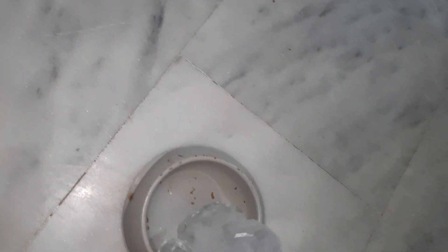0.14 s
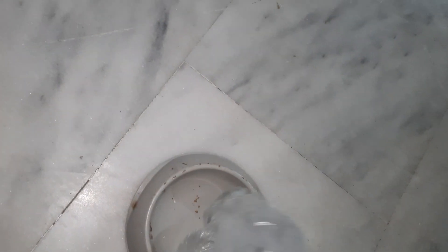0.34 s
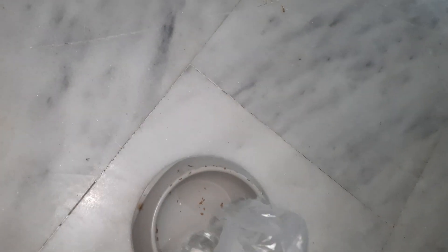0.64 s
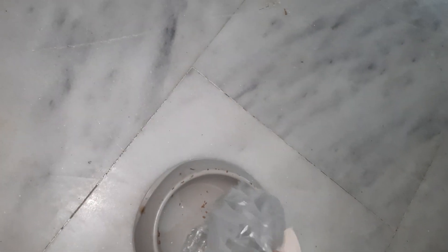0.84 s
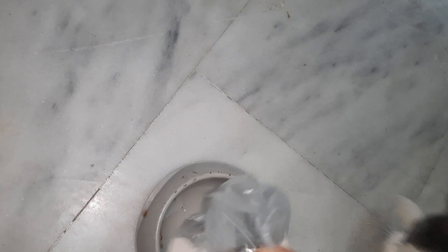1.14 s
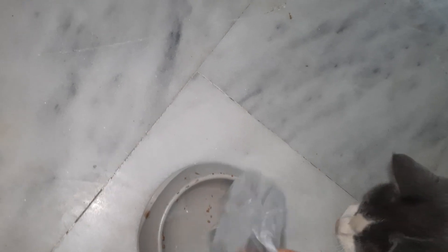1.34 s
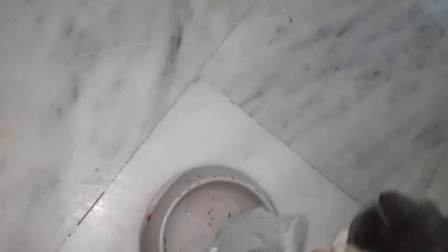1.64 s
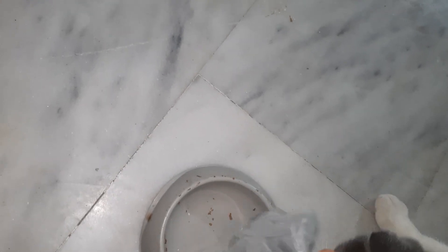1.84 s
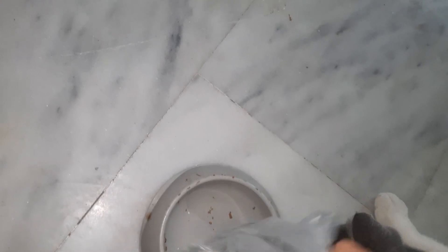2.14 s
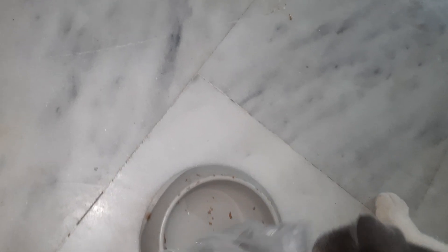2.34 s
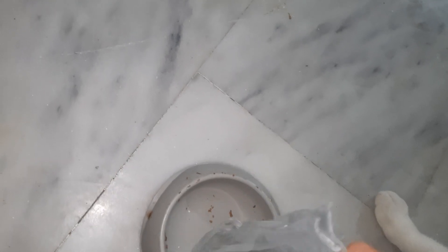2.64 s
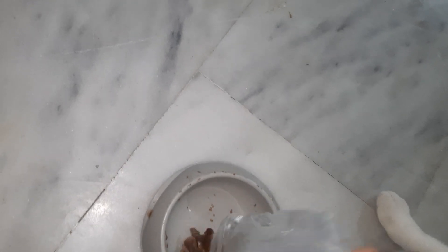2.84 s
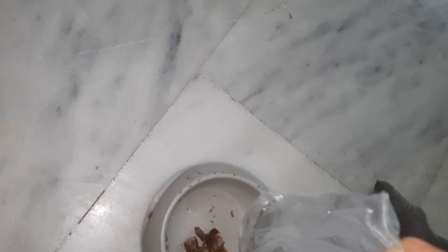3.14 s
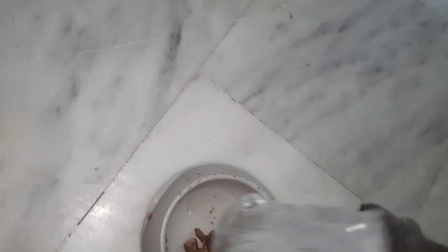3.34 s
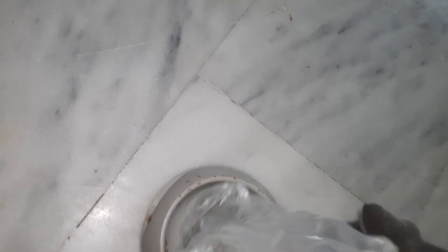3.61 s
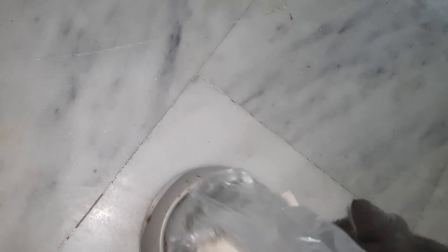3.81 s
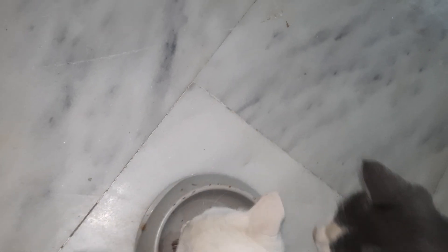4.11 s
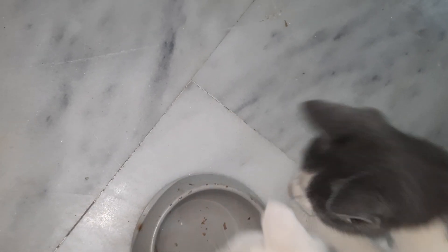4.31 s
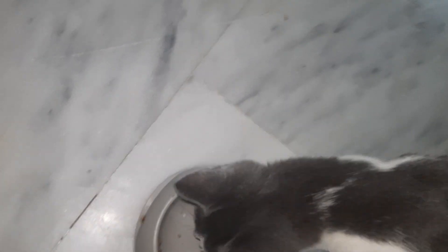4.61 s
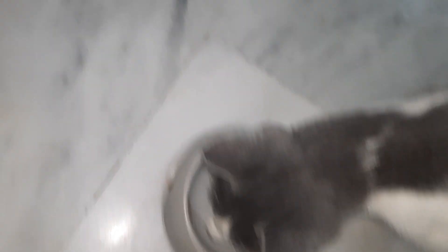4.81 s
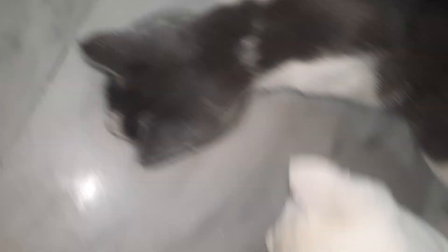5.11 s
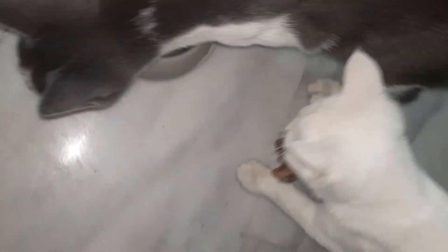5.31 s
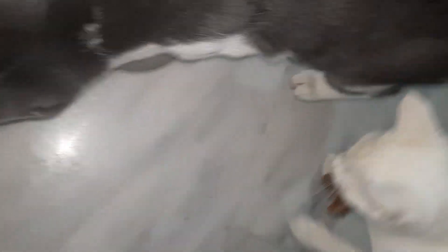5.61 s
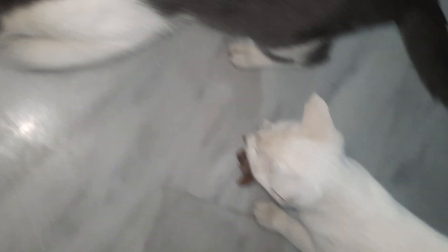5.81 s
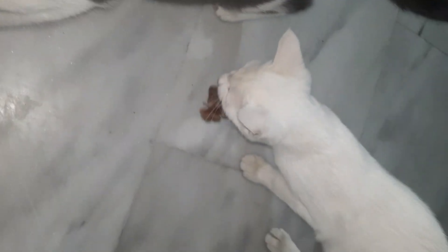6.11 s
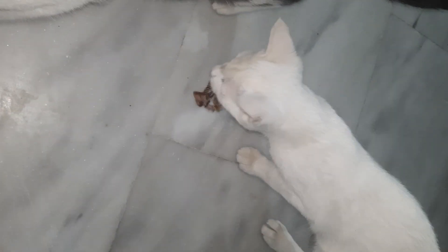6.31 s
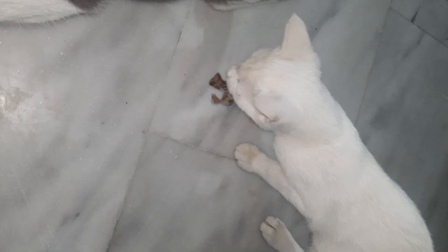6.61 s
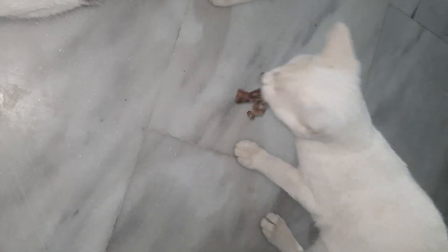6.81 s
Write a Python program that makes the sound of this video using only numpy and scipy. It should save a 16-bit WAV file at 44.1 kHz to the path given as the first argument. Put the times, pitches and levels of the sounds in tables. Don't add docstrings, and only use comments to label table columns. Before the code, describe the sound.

Brisk plastic rustling and a small knock on a bowl give way to a close cat's throaty, rattling growl with wet bites and lip smacks.

```python
import sys
import numpy as np
from scipy import signal
from scipy.fft import rfft, irfft, next_fast_len
from scipy.io import wavfile
from scipy.ndimage import uniform_filter1d

SR = 44100
rng = np.random.default_rng(int(sys.argv[2]) if len(sys.argv) > 2 else 0)


def master_out(mix):
    frames = np.transpose(np.atleast_2d(mix))
    ceiling = np.clip(frames, -1, 1)
    pcm = np.round(ceiling * 32767).astype(np.int16)
    wavfile.write(sys.argv[1], SR, pcm)


def amplitude_ratio(level_db):
    exponent = np.asarray(level_db, float) / 20
    return 10 ** exponent


N = 306495
STEP = 64
CLOCK = np.arange(0, N + STEP, STEP) / SR
RASP_LEFT_DB = 9

# t/s, pulse rate f/Hz, effort level/dB
GROWL = [
    [(4.155, 144, -51), (4.21, 141, -44), (4.25, 139, -42), (4.29, 134.5, -41.5), (4.35, 130.5, -41.5),
     (4.39, 132.5, -42), (4.43, 131.5, -42.5), (4.5, 138, -42), (4.53, 141, -41)],
    [(4.54, 141, -41), (4.57, 138.5, -40.5), (4.64, 132.3, -41), (4.7, 135.5, -40.5), (4.765, 138.5, -40)],
    [(4.775, 144, -38.5), (4.81, 148, -38), (4.88, 145.5, -38.5), (4.92, 142, -39), (4.95, 145, -38.5),
     (4.99, 139.5, -39.5), (5.02, 146.5, -38), (5.09, 144.5, -37.5), (5.13, 138, -39.5)],
    [(5.16, 140.5, -40), (5.2, 137, -39.5), (5.23, 144, -37), (5.3, 147.5, -35.5), (5.41, 145.5, -36),
     (5.51, 146, -36), (5.55, 141, -38.5), (5.65, 148.5, -38), (5.79, 143, -39)],
    [(5.8, 140, -41.5), (5.86, 133, -42), (5.9, 148, -40), (5.93, 141, -41), (5.97, 134, -41.5),
     (6.04, 144.5, -41.5), (6.1, 142, -42), (6.15, 138.5, -42.5), (6.2, 139, -43)],
    [(6.25, 130, -46), (6.3, 136, -45.5), (6.36, 135.5, -44), (6.45, 132, -43.5), (6.49, 134, -45)],
    [(6.5, 136, -43), (6.55, 142.5, -42.5), (6.6, 143, -42), (6.66, 148, -41), (6.7, 147, -40.5),
     (6.75, 143, -41.5), (6.8, 138.5, -43.5), (6.86, 139, -45), (6.94, 133, -46)],
]
# flap slip with tight folds f/Hz, nose f/Hz, nose level/dB, rasp level/dB
VOICE = [
    (4, 535, -11.5, -31),
    (4, 535, -12, -31),
    (18, 520, -13.5, -32),
    (18, 480, -13, -34),
    (28, 600, -16, -22),
    (24, 600, -16, -22),
    (26, 620, -14, -24),
]
ROUGHNESS = [.09, .09, .15, .14, .17, .18, .17]


def growl():
    hz, effort_db = curves(sum(GROWL, []))
    slip_hz, nose_hz, nose_db, rasp_db = by_phrase(VOICE)
    rough = by_phrase(ROUGHNESS)
    since = np.maximum(np.arange(N) / SR - GROWL[0][0][0], 0)
    onset = np.minimum(since / 0.021, 1)
    level = amplitude_ratio(effort_db - 2.0) * onset
    pulses, puffs = vocal_folds(hz, slip_hz, rough)
    low = level * chest(pulses, puffs, rough)
    upper = level * nose(pulses, puffs, rough, nose_hz, nose_db, effort_db, since)
    upper = upper + level * rasp(pulses, puffs, rasp_db, since)
    upper = upper + onset * mouth(puffs)
    return low + upper + room(amplitude_ratio(-15) * low + amplitude_ratio(-10) * upper)


# t/s, depth [share]
FLAP_STRENGTH = [(4.16, .9), (4.3, 1.1), (4.42, 1.05), (4.48, .72), (4.56, 1.35), (4.75, 1.1), (4.79, .92),
                 (5.0, 1.02), (5.19, 1.08), (5.25, .74), (5.5, .76), (5.56, 1.05), (5.78, 1.02),
                 (5.97, 1.45), (6.05, 1.2), (6.5, 1.25), (6.69, .9), (6.8, 1.2)]


def vocal_folds(hz, slip_hz, rough):
    slack_hz, tight_hz, tight_depth = 132, 147, .88
    tight = np.clip((hz - slack_hz) / (tight_hz - slack_hz), 0, 1.2)
    depth = curves(FLAP_STRENGTH)[0] * (1 - (1 - tight_depth) * tight)
    depth = 0.57 * depth * (1 + .6 * rough * drift(.03))
    jitter = 1 + rough * (.17 * drift(.007) + .11 * drift(.025))
    steady = 2 * np.pi * np.cumsum(hz * jitter) / SR
    lag = slip(slip_hz * tight + 45. * rough * drift(.02), pull_hz=4.)
    flap = (steady + 3.71 - lag) / 2
    turn = steady + depth * np.sin(flap)
    shimmer = amplitude_ratio(9 * rough * np.clip(drift(.007), -1.7, 1.7))
    size = (1 + 0.91 * depth * np.cos(flap - .1)) * shimmer
    pulses = evened(-size * sum(np.cos(k * turn) for k in range(1, 15)))
    puffs = evened(size * np.exp(1.6 * np.cos(turn)) * rng.standard_normal(N))
    return pulses, puffs


def slip(apart_hz, pull_hz):
    step, lag = 50, [0.]
    for hz in apart_hz[::step]:
        lag.append(lag[-1] + 2 * np.pi * (hz - pull_hz * np.sin(lag[-1])) * step / SR)
    return np.interp(np.arange(N) / step, np.arange(len(lag)), lag)


# f/Hz, level/dB
CHEST_TONE = [(70, -40), (110, -17), (140, -2.5), (210, 1.5), (300, 4), (360, -1), (430, -6.5),
              (520, -14.5), (800, -77)]


def chest(pulses, puffs, rough):
    return colour(pulses + 0.4 * rough * puffs, CHEST_TONE) * panned(10.5)[:, None]


# f/Hz, level/dB
NOSE_TONE = [(330, -17), (430, -10), (520, -5), (650, 0), (800, -4), (920, -1), (1200, -35.5)]


def nose(pulses, puffs, rough, hz, db, effort_db, since):
    lips = np.exp(-since / .2)
    usual_db = by_phrase([np.mean(phrase, 0)[2] for phrase in GROWL])
    hz = hz + 170 * lips
    db = db + 4 * lips + 1.1 * (effort_db - usual_db)
    breathy = pulses + 90 * rough ** 2 * puffs
    ringing = resonate(breathy, hz, 322.0) + 0.083 * evened(breathy)
    left = colour(ringing, NOSE_TONE)[0] * amplitude_ratio(db)
    right = np.roll(left, 14)
    return np.array([left, right]) * panned(1)[:, None]


# f/Hz, level/dB
RASP_TONE = [(650, -29), (900, 2), (1100, 12), (1350, 3.5), (1600, 15), (1850, 4), (2100, -15), (2900, -36)]
# t/s, time per 10 dB/s, level over resting rasp/dB
STRAINS = [
    (4.5, .1, 4),
    (5.47, .1, 5),
    (5.7, .1, 6),
    (6.01, .05, 4),
    (6.17, .07, 9),
    (6.38, .07, 7),
    (6.66, .08, 5),
    (6.83, .08, 7),
]


def rasp(pulses, puffs, db, since):
    start_db = 36 * np.exp(-since / .06)
    gain = amplitude_ratio(db + start_db) * (1 + together(peak(*row) for row in STRAINS))
    hoarse = evened(pulses + 1.05 * puffs)
    hoarse = hoarse + 0.68 * resonate(hoarse, 0.46 * low_mouth_hz(), 520.0)
    return colour(hoarse, RASP_TONE) * gain * amplitude_ratio(-4) * panned(RASP_LEFT_DB)[:, None]


# t/s, opening [0-1]
JAW = [(4.3, .75), (4.6, 1.), (5.1, .97), (5.3, .8), (5.75, .6), (5.87, .3), (5.93, .8), (6.02, .15),
       (6.16, .75), (6.24, .85), (6.33, .3), (6.41, .62), (6.55, .2), (6.76, 0.), (6.85, .4), (6.95, .62)]


def low_mouth_hz():
    shut_hz, open_hz = 1850, 2700
    jaw, = curves(JAW)
    return shut_hz + (open_hz - shut_hz) * jaw


# t/s, high mouth ring f/Hz
TONGUE = [(4.3, 5600), (5.9, 5700), (6.0, 5800), (6.1, 6100), (6.17, 6500), (6.25, 5800), (6.36, 6400),
          (6.42, 6000), (6.5, 5400), (6.6, 5200), (6.7, 5800), (6.78, 6500), (6.85, 6200), (6.95, 5500)]
# t/s, time per 10 dB/s, low ring level/dB, high ring level/dB
CHEWS = [(4.35, .1, -4, -14), (4.53, .2, -1, -16), (4.8, .25, -2, -16), (5.1, .12, -2, -14),
         (5.72, .12, -25, -9), (5.9, .04, -3, -6), (6.0, .04, -5, -7), (6.15, .06, -4, 1),
         (6.23, .04, -8, -10), (6.4, .07, 2, -2), (6.53, .06, -8, -11), (6.66, .08, -9, -14),
         (6.78, .07, -14, -1), (6.92, .06, 0, -12)]


def mouth(puffs):
    low_gain = together(peak(s, width, low_db) for s, width, low_db, _ in CHEWS)
    high_gain = together(peak(s, width, high_db) for s, width, _, high_db in CHEWS)
    high_hz, = curves(TONGUE)
    low = low_gain * amplitude_ratio(-73) * resonate(puffs, low_mouth_hz(), 420)
    high = high_gain * amplitude_ratio(-70) * resonate(puffs, high_hz, 600)
    return (low + high) * panned(RASP_LEFT_DB)[:, None]


# t/s, turn [0-1]
TURN = [(0, .02), (1.05, .25), (2.8, .25), (3.2, .1), (3.9, 0.), (4.3, .75), (5.9, 1.), (6.95, .95)]
# f/Hz, level/dB
FILM_TONE = [(3600, -19), (4800, -6), (6300, -.5), (8350, -3.5), (9600, -9.5), (13000, 2), (14500, -1),
             (16000, -7.5), (17000, -36)]
# f/Hz, level/dB
SHEET_TONE = [(1950, -26), (2150, -12), (2350, 0), (2700, 0), (3200, -2.5), (4000, 3), (4800, -9),
              (5800, -23.5)]
# f/Hz, level/dB
FOLD_TONE = [(160, -60.5), (280, -9), (334, -6), (527, -16), (810, -7), (975, -5), (1130, -10),
             (1520, -0.5), (2100, -6), (2730, -41), (4620, -120)]
# t/s, time per 10 dB/s, level/dB
CREAKS = [(.88, .05, -70), (1.35, .12, -66), (1.62, .12, -64), (1.75, .04, -63), (2.25, .05, -63),
          (2.57, .04, -60), (2.79, .02, -51), (3.62, .04, -79), (3.9, .07, -63), (4.24, .06, -56),
          (4.5, .04, -60), (5.17, .05, -64), (5.37, .05, -58), (5.44, .06, -58)]


def bag():
    crackle, lower = handling()
    turn, = curves(TURN)
    creaks = together(peak(*row) for row in CREAKS)
    folds = np.hypot(lower * amplitude_ratio(-10.5 - 13 * turn), creaks)
    clump = amplitude_ratio(1.16 * drift(0.005) + 1.06 * drift(0.025))
    layers = ((8000, 4.0, FILM_TONE, 0.2, crackle * amplitude_ratio(3.5)),
              (5130, 3.8, SHEET_TONE, 0.4, lower * amplitude_ratio(-9 + 2.5)),
              (1728, 1.08, FOLD_TONE, 0.86, folds))
    out = 0
    for per_s, spread_db, tone, same, gain in layers:
        sizes = amplitude_ratio(spread_db * np.minimum(rng.exponential(1, (2, N)), 6))
        sizes = sizes * rng.choice([-1, 1], (2, N))
        creases = evened(pair(sizes * (rng.random((2, N)) < per_s / SR), same))
        blur = 0.6 * pair(rng.standard_normal((2, N)), same)
        out = out + gain * colour(clump * (creases + blur), tone)
    return out * panned(4.5 + 7.5 * turn)


# start t/s, length/s, crackle level/dB, lower layers level/dB
MOVES = [(0, .26, -59, 0), (.33, .125, -65, -4), (.49, .03, -67, -4), (.575, .045, -61, -1),
         (.67, .14, -60, 1), (.865, .07, -60, 0), (1.02, .065, -66, -5), (1.135, .3, -56.5, 0),
         (1.45, .72, -64, -1), (2.2, .6, -57.5, -2), (2.87, .06, -60, 1), (2.96, .13, -71.5, -2),
         (3.11, .08, -75, -4), (3.22, .24, -66.5, -4), (3.53, .11, -65, -5), (3.72, .008, -65, -12),
         (3.775, .05, -55, -6), (3.84, .12, -53.5, 1), (3.99, .12, -59, 0), (4.43, .11, -55, 1),
         (4.58, .1, -58.5, 1), (4.7, .15, -55.5, 1), (4.94, .03, -65, -2), (5.17, .2, -62, 4),
         (5.52, .23, -69.5, -5), (5.76, .23, -72.5, -1), (6.09, .1, -75, 3), (6.38, .19, -75, -12),
         (6.64, .08, -71, 0), (6.915, .04, -74, 2)]
# t/s, time per 10 dB/s, crackle level/dB, lower layers level/dB
SHAKES = [(1.57, .085, -50.5, 0), (1.725, .05, -51.5, -1), (1.92, .09, -51, -1), (2.07, .06, -48.5, 0),
          (2.245, .05, -49, 0), (2.41, .03, -45, 3), (2.585, .045, -46.5, 4), (2.78, .04, -44.5, 5),
          (4.22, .12, -48, 1), (5.078, .06, -47, 3), (5.435, .085, -53, 1), (6.212, .02, -61.5, 4)]


def handling():
    parts = [(hold(*row[:3]), row[3]) for row in MOVES]
    parts += [(peak(*row[:3]), row[3]) for row in SHAKES]
    parts += [(-80.5, -4)]
    crackle = together(db for db, _ in parts)
    lower = together(db + lower_db for db, lower_db in parts)
    return crackle, lower


# t/s, peak level/dB, left minus right level/dB
SNAPS = [(0.1082, -33, 1.5), (0.1331, -44, 1.0), (0.2588, -41, 0.5), (0.3094, -47, 0.5), (0.3985, -48, 1.5),
         (0.5706, -50, 3.5), (0.6629, -43, 1.0), (0.8006, -46, 3.0), (1.0066, -54, 6.0), (1.1403, -44, 2.5),
         (1.4666, -43, 3.5), (1.4865, -39, 2.5), (1.61, -41, 4.0), (1.8597, -44, 3.5), (1.889, -39, 3.5),
         (1.927, -38, 3.5), (1.947, -38, 4.0), (1.9729, -38, 5.5), (2.2444, -36, 3.0), (2.4014, -38, 4.0),
         (2.7954, -30, 4.5), (2.8754, -45, 3.5), (3.3483, -50, 2.5), (3.481, -38, -5.0),
         (3.4955, -41, -1.5), (3.7574, -43, 2.0), (3.797, -43, 2.0), (3.818, -43, 2.0), (3.8954, -40, 0.5),
         (3.966, -43, 1.0), (4.0951, -42, 3.0), (4.5044, -43, 7.0), (4.6049, -43, 8.0), (4.9432, -46, 10.5),
         (5.0399, -38, 10.0), (5.737, -46, 9.0)]


def snaps():
    out, t = np.zeros((2, N)), np.arange(500) / SR
    bursts = rng.standard_normal((len(SNAPS), 2, 500)) * amplitude_ratio(-60 * t / .009) * np.minimum(t / .001, 1)
    shape = colour(np.eye(1, N), FILM_TONE)[:, :300]
    for (s, db, left_db), burst in zip(SNAPS, bursts):
        sound = signal.fftconvolve(burst, shape, axes=1)
        at = round(s * SR)
        out[:, at:at + sound.shape[1]] += amplitude_ratio(db) * panned(left_db)[:, None] * sound / abs(sound).max()
    return out + amplitude_ratio(-13) * room(out)


# f/Hz, left minus right level/dB
OPENINGS = [(100, 18), (450, -2), (1200, 8.5), (2000, 2.5), (3300, -3), (5500, 3.5), (9000, -5.5),
            (15000, -4)]


def ports(x):
    left_lag_s = .00011
    size = next_fast_len(N)
    hz = np.fft.rfftfreq(size, 1 / SR)
    delay = np.exp(-2j * np.pi * hz * np.array([[left_lag_s], [0]]))
    tilt = panned(read(OPENINGS, hz)) * delay
    return irfft(rfft(x, size) * tilt, size)[:, :N]


# t/s, peak level/dB, f/Hz, t60/s, left minus right level/dB
KNOCKS = [
    (2.782, -33.5, 946, 0.034, 3.5),
    (4.116, -33.5, 985, 0.021, 6.5),
    (4.124, -46, 1000, 0.02, 7.0),
    (5.906, -43, 976, 0.024, 8.5),
    (6.153, -49, 1098, 0.02, 6.5),
]
# t/s, peak level/dB, f/Hz, t60/s, left minus right level/dB
SMACKS = [
    (4.155, -48, 1460, 0.025, 10),
    (4.1631, -42, 1570, 0.03, -1),
    (5.9071, -70, 1399, 0.025, 16),
    (6.2029, -47, 2580, 0.022, -1),
    (6.2114, -50, 1490, 0.025, 6),
    (6.9135, -51, 1420, 0.025, 0),
]
# t/s, peak level/dB, f/Hz, t60/s, left minus right level/dB
LICKS = [
    (3.4955, -55, 3950, 0.012, -1.5),
    (4.5044, -50, 2900, 0.015, 7),
    (4.506, -51, 2250, 0.015, 7),
    (4.766, -48, 2650, 0.02, 8),
    (5.9056, -55, 2770, 0.02, 8.5),
    (5.9329, -60, 2940, 0.02, 4.0),
    (6.1536, -52, 1580, 0.02, 9),
]
# t/s, peak level/dB, f/Hz, t60/s, left minus right level/dB
BITES = [
    (4.6753, -47, 5640, 0.017, 12.0),
    (5.905, -43, 5790, 0.011, 9.0),
    (5.9324, -58, 3980, 0.012, 13),
    (6.2024, -46, 6130, 0.019, 10),
    (6.2244, -59, 6600, 0.02, 14),
    (6.3641, -58.5, 6370, 0.023, 12.1),
    (6.4143, -60, 6000, 0.017, 5.5),
    (6.446, -55, 6630, 0.017, 10.0),
    (6.683, -61, 5720, 0.02, 15),
    (6.9144, -61, 5885, 0.025, 11),
]


def contacts():
    out, t = np.zeros((2, N)), np.arange(1500) / SR
    softer_bites = [(s, db - 3, *rest) for s, db, *rest in BITES]
    groups = ((KNOCKS, (.9, 1.0, 1.08, 1.58, 1.68, 1.8)),
              (SMACKS + LICKS + softer_bites, (.95, 1.0, 1.04)))
    for rows, ratios in groups:
        for s, db, hz, t60, left_db in rows:
            ring = sum(np.sin(2 * np.pi * (hz * ratio * t + rng.random((2, 1)) * 0.53)) for ratio in ratios)
            ring = ring * amplitude_ratio(-60 * t / t60) * np.minimum(t / 0.003, 1)
            ring = amplitude_ratio(db) * panned(left_db)[:, None] * ring / abs(ring).max()
            part = out[:, round(s * SR):][:, :len(t)]
            part += ring[:, :part.shape[1]]
    return out + amplitude_ratio(-10) * room(out)


# f/Hz, level/dB
RUMBLE_TONE = [(15, -63), (25, -40), (40, -13.5), (59, 3), (70, -1), (97, -5.5), (144, -4.5), (215, -14),
               (329, -10), (450, -19), (580, -31), (990, -120)]
# f/Hz, level/dB
HISS_TONE = [(240, -8), (400, 23.5), (1310, 17), (1580, 14), (1960, -8), (7280, 1), (9760, -0.5),
             (13300, -2.5), (16000, -20)]
# t/s, time per 10 dB/s, level/dB
GRIPS = [
    (1.59, .2, -75),
    (2.4, .12, -70),
    (2.8, .15, -68),
    (4.35, .15, -62),
    (4.55, .15, -59),
    (5.0, .15, -65),
    (5.45, .2, -65),
    (6.28, .3, -63),
    (5.95, .15, -63),
    (6.72, .25, -63),
]


def floor():
    turn, = curves(TURN)
    rumble = np.hypot(amplitude_ratio(-77 + 10 * turn), together(peak(*row) for row in GRIPS))
    lows = colour(pair(rng.standard_normal((2, N)), 0.52), RUMBLE_TONE)
    lows = lows * rumble * amplitude_ratio(2.0 + 1.7 * drift(0.03))
    hiss = amplitude_ratio(-84.5) * colour(rng.standard_normal((2, N)), HISS_TONE)
    return (lows + hiss) * panned(1 + 12 * turn)


# f/Hz, t60/s
ROOM = [(150, 0.083), (600, 0.22), (3000, 0.23), (12000, 0.033)]


def room(x):
    taps = np.zeros((2, SR // 2))
    at = np.arange(100, SR // 2 - 20, 20) + rng.integers(0, 20, (2, (SR // 2 - 101) // 20))
    np.put_along_axis(taps, at, rng.choice([-1., 1.], at.shape), 1)
    hz, t, z = signal.stft(taps, SR, nperseg=256)
    tail = signal.istft(z * amplitude_ratio(-60 * t / read(ROOM, hz)[:, None]), SR, nperseg=256)[1]
    return signal.fftconvolve(x, tail / np.linalg.norm(tail[0]), axes=1)[:, :N]


def evened(x):
    return x / np.sqrt(np.mean(x ** 2) + 1e-20)


def read(points, hz):
    f, value = np.transpose(points)
    return np.interp(np.log(hz + 1), np.log(f + 1), value)


def curves(rows):
    s, *columns = np.transpose(rows)
    return [np.interp(np.arange(N) / SR, s, c) for c in columns]


def by_phrase(values):
    at = np.searchsorted([phrase[0][0] for phrase in GROWL[1:]], np.arange(N) / SR)
    return uniform_filter1d(np.asarray(values, float)[at], round(.03 * SR), axis=0).T


def panned(left_db):
    return amplitude_ratio(np.array([left_db / 2, -left_db / 2]))


def colour(x, points):
    hz = abs(np.fft.fftfreq(16384, 1 / SR))
    log_gain = np.log(amplitude_ratio(np.maximum(read(points, hz), -100)))
    taps = np.fft.ifft(np.exp(np.conj(signal.hilbert(log_gain)))).real[:4096]
    return evened(signal.oaconvolve(np.atleast_2d(x), taps[None], axes=1)[:, :N])


def resonate(x, hz, width):
    turn = np.exp(2j * np.pi * np.cumsum(hz) / SR)
    r = np.exp(-np.pi * width / SR)
    smooth = signal.lfilter([1], np.convolve([1, -r], [1, -r]), x / turn)
    return evened((turn * smooth).real)


def drift(seconds):
    size = max(round(seconds * SR), 2)
    return evened(uniform_filter1d(uniform_filter1d(rng.standard_normal(N), size), size))


def pair(draw, same):
    same = np.clip(same, 0, 1)
    return np.array([draw[0], same * draw[0] + np.sqrt(1 - same ** 2) * draw[1]])


def peak(s, width, db):
    return db - 10 * np.maximum(s - CLOCK, (CLOCK - s) / .8) / width


def hold(s, length, db):
    rise_db_s, fall_db_s = 420, 260
    before, after = (s - CLOCK) * rise_db_s, (CLOCK - s - length) * fall_db_s
    return db - np.maximum(0, np.maximum(before, after))


def together(levels_db):
    return np.interp(np.arange(N) / SR, CLOCK, np.sqrt(sum(amplitude_ratio(db) ** 2 for db in levels_db)))


def scene():
    return growl() + ports(bag() + snaps()) + contacts() + floor()


def top_cut(x):
    return signal.sosfilt(signal.butter(12, 15840, fs=SR, output="sos"), x)


def record(dry):
    return top_cut(dry)


dry = scene()
out = record(dry)
master_out(out)
```